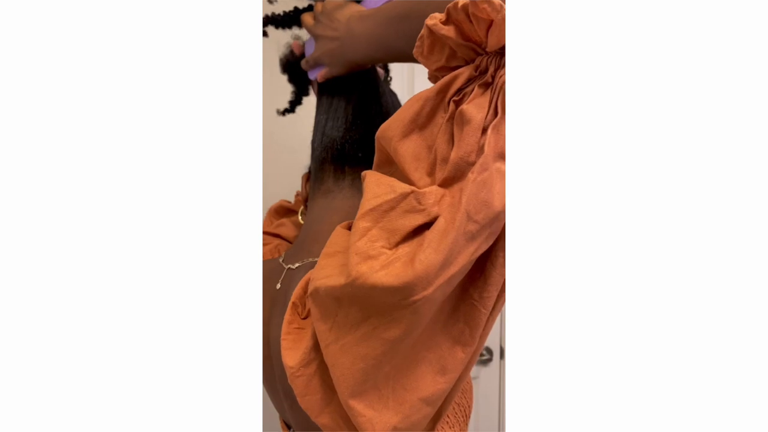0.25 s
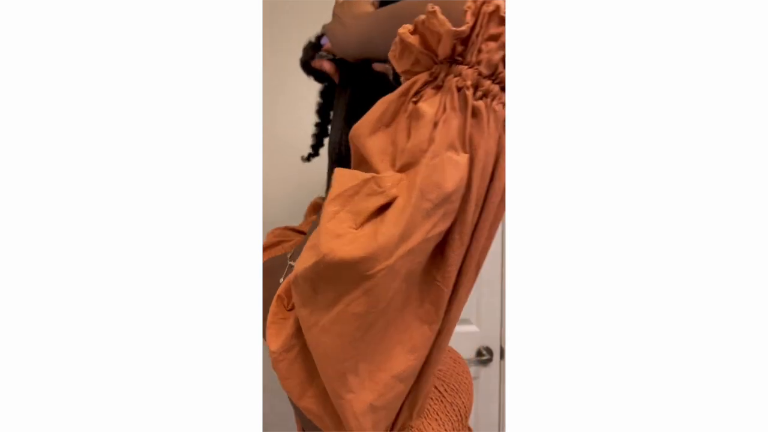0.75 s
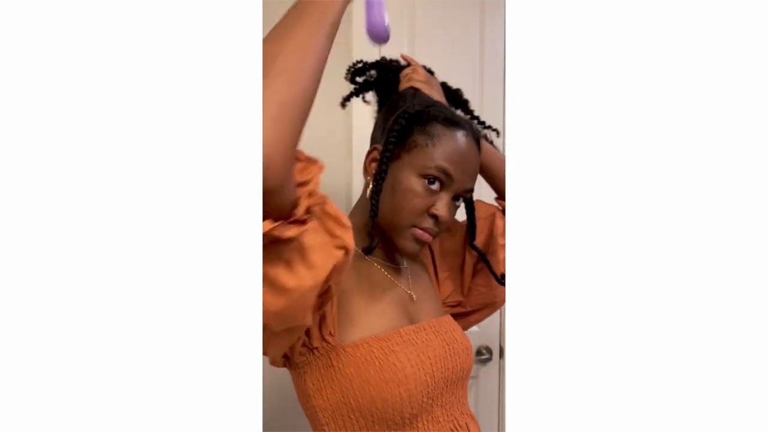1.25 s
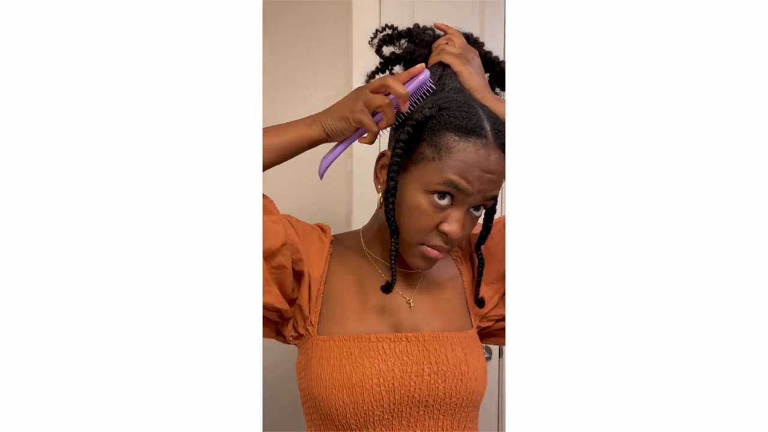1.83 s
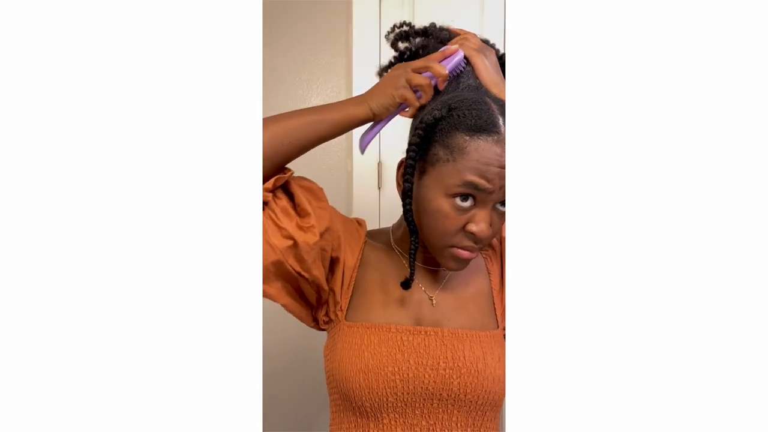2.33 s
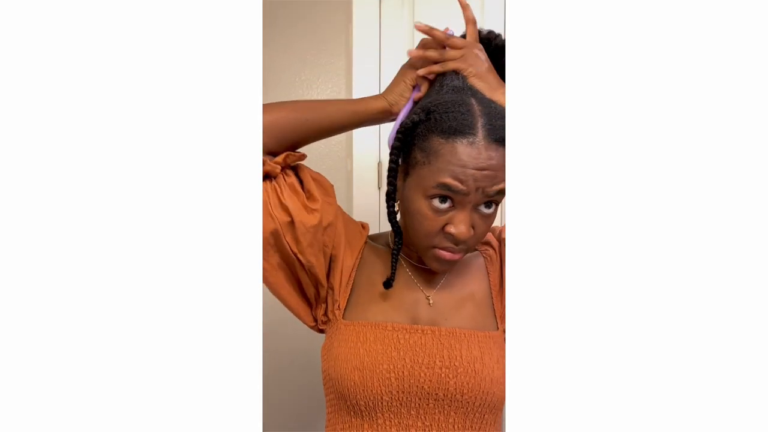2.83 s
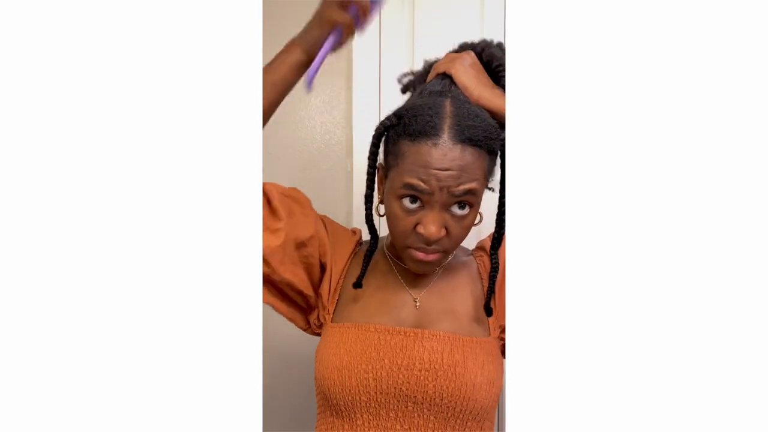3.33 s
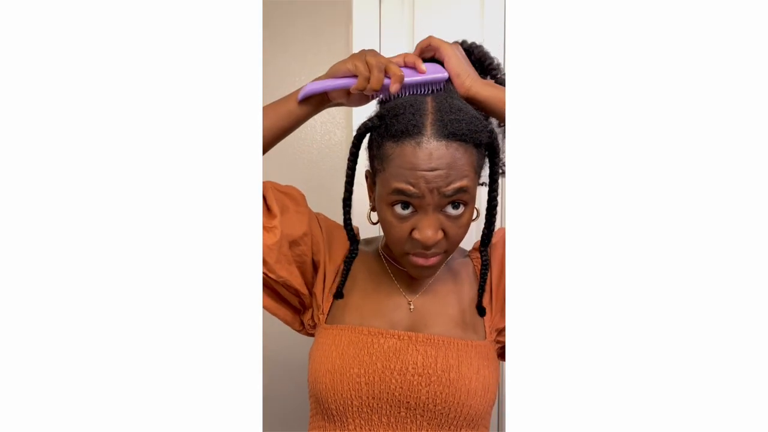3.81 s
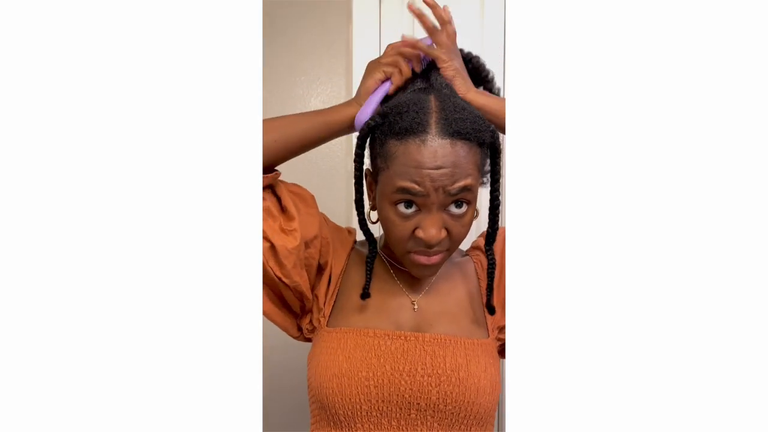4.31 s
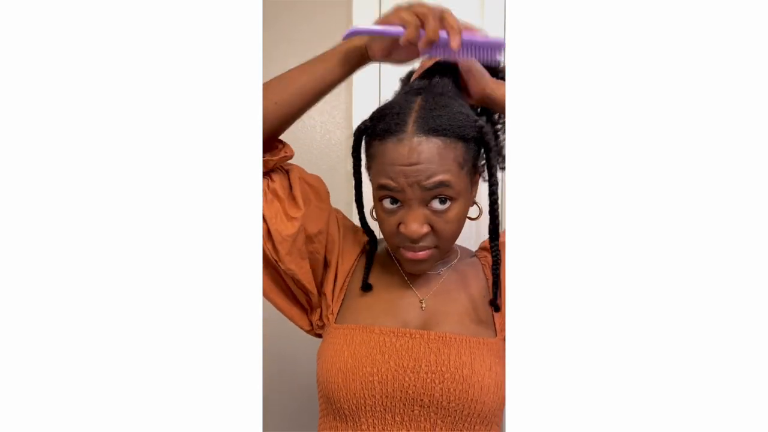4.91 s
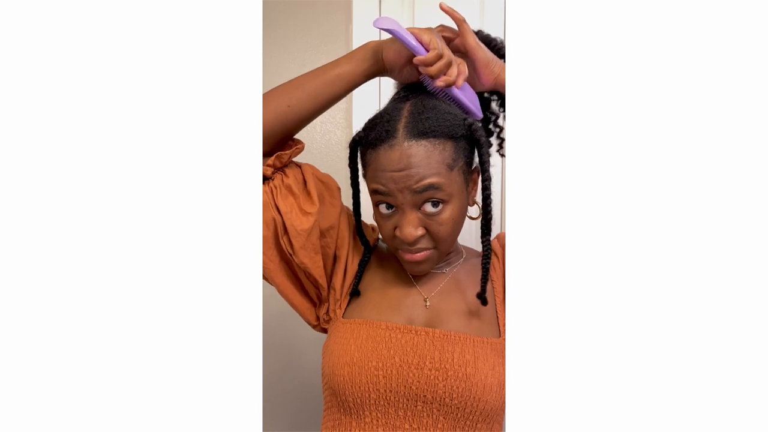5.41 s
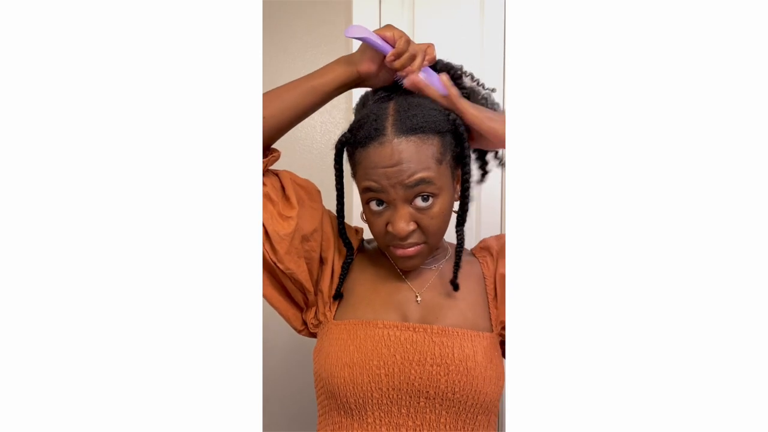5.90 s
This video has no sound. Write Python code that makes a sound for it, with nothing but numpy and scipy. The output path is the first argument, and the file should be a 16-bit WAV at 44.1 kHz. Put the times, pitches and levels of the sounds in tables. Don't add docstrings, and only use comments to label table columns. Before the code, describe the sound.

Scratchy brush strokes rasp through gel-stiff hair in quick bursts, with plastic knocks and bristle pings, a quiet gap, then harder crackling pulls.

```python
import sys
import numpy as np
from scipy import signal
from scipy.fft import rfft, irfft
from scipy.io import wavfile
from scipy.ndimage import uniform_filter1d

SR = 44100
rng = np.random.default_rng(int(sys.argv[2]) if len(sys.argv) > 2 else 0)


def amp(db):
    return 10 ** (np.asarray(db, float) / 20)


def write(x):
    x = np.atleast_2d(x).T
    wavfile.write(sys.argv[1], SR, np.round(np.clip(x, -1, 1) * 32767).astype(np.int16))


N = 271215
HZ = np.fft.rfftfreq(N, 1 / SR)

GRIP_CHANGE_S = [1.12, 1.8, 2.82, 2.931, 3.27, 4.22, 4.95, 5.56, 5.89]
# (frequency [Hz], level [dB])
SCRAPE_COLOUR = [(200, -43), (450, -13), (700, 4), (1400, 2), (1750, -2.5), (2300, 0.5), (3400, -4.5),
                 (4600, -12.5), (6000, -18)]
# (frequency [Hz], level [dB])
STRAND_COLOUR = [(2500, -4.5), (4500, 7.5), (6000, 3.5), (7500, 10), (9000, 5.5), (11500, -6), (14000, 1),
                 (15800, -1)]
FULL_EFFORT_DB = -44.5


def read(table):
    f, v = np.transpose(table)
    return np.interp(np.log(HZ + 1), np.log(f + 1), v)


def follow(table):
    s, *columns = np.transpose(table)
    return [np.interp(np.arange(N) / SR, s, c) for c in columns]


def unit(x):
    return x / np.sqrt(np.mean(x ** 2))


def colour(x, table):
    return unit(irfft(rfft(x) * amp(read(table)), N))


def walk(rate):
    hold = int(SR / rate)
    steps = np.repeat(rng.standard_normal(N // hold + 1), hold)
    return 1.1 * uniform_filter1d(uniform_filter1d(steps, hold), hold)[:N]


def swells(rows):
    lift_db, lift_steeper = 13.5, 1.47
    t = np.arange(0, N, 64) / SR
    under_db = np.array([20 * np.maximum((s - t) / max(rise, .005), (t - s) / max(fall, .005))
                         for s, db, rise, fall, *_ in rows])
    under_db += lift_steeper * np.maximum(under_db - lift_db, 0)
    peak_db = np.array(rows)[:, 1:2]
    return t, amp(2 * (peak_db - under_db))


def ring(x, hz, width):
    return signal.lfilter(*signal.iirpeak(hz, hz / width, SR), x)


def bent_ring(x, hz, width):
    turn = np.exp(2j * np.pi * np.cumsum(hz) / SR)
    pole = np.exp(-np.pi * width / SR)
    return 2 * np.real(turn * signal.lfilter([1 - pole], [1, -pole], x * turn.conj()))


def struck(events, push_s, trim_db):
    out = np.zeros(N + SR)
    for s, db, hz, t60 in events:
        t = np.arange(int(np.clip(t60, .01, .5) * SR)) / SR
        decay = amp(db + trim_db - 60 * t / t60)
        wave = decay * (1 - np.exp(-t / push_s)) * np.sin(2 * np.pi * hz * t)
        out[int(s * SR):int(s * SR) + len(t)] += wave
    return out[:N]


def fan_hum():
    # (time [s], rumble level [dB], extra level of the lowest mode [dB])
    fan_curve = [(0.0, -54, -4), (.48, -53, 3), (.6, -49, 0), (1.0, -47, -0.5), (1.16, -52, 0.5),
                 (1.3, -49.5, -0.5), (1.56, -52, 0), (2.3, -52, 7.5), (2.88, -50.5, 0), (3.36, -53, 2),
                 (3.82, -53.5, 0), (4.3, -53, 2.5), (5.17, -50, -2), (5.48, -59.5, -8), (5.75, -44, 0),
                 (5.87, -57, -3), (6.15, -51.5, 0)]
    # (frequency [Hz], width [Hz], level [dB])
    room_modes = [
        (60.6, 2.7, -5),
        (119.76, 2.54, -4.5),
        (196.3, 6.7, -23.5),
        (292, 20, -31),
    ]
    fan_db, sway_db = follow(fan_curve)
    noise = rng.standard_normal(N)
    lowest_hz = room_modes[0][0]
    hum = sum(amp(db + sway_db * (f == lowest_hz)) * unit(ring(noise, f, w)) for f, w, db in room_modes)
    return amp(fan_db) * hum


def air_noise():
    # (frequency [Hz], level [dB])
    air_colour = [(20, -6), (40, 8), (60, 12), (90, 8), (150, -48), (250, -31), (500, -47), (1500, -37),
                  (4000, -27), (16000, -29)]
    return amp(-58 + 3.5 * walk(3.98)) * colour(rng.standard_normal(N), air_colour)


def sleeve_rustle(effort_db):
    # (frequency [Hz], level [dB])
    sleeve_colour = [(90, -4.5), (160, -4), (300, -10.5), (500, -5.5), (800, -25.5)]
    # (time [s], level [dB], 20 dB rise [s], 20 dB fall [s])
    arm_moves = [
        (1.16, -59.5, .2, .2),
        (4.31, -53.5, 0.09, 0.22),
        (5.75, -51.5, 0.42, 0.39),
    ]
    t, power = swells(arm_moves)
    with_brush = amp(-62.5 + .5 * (effort_db - FULL_EFFORT_DB))
    arm = with_brush + np.interp(np.arange(N) / SR, t, np.sqrt(power.sum(0)))
    cloth = amp(3.7 * walk(25)) * colour(rng.standard_normal(N), sleeve_colour)
    return amp(-6.0) * arm * cloth


def room_tone(effort_db):
    return fan_hum() + sleeve_rustle(effort_db) + air_noise()


def effort():
    # (time [s], scrape
    # level [dB], 20 dB rise [s], 20 dB fall [s], low body re scrape [dB])
    strokes = [(0.002, -44, .1, 0, -4.5), (.116, -37, 0.15, 0.16, -2), (.37, -38.5, 0.26, 0.156, -2),
               (.56, -38, .065, 0.12, 1), (.795, -39.5, 0.06, 0.2535, -1.5), (.865, -41, 0.21, 0.1455, 0.5),
               (.934, -47, 0.4, 0, -3), (2.142, -37, 0.156, 0.21, -3), (2.362, -36, 0.22, 0.2, -4.5),
               (2.495, -39.5, 0.04, 0.08, -3), (2.596, -39, 0.09, .5, -3), (2.754, -39, .4, 0, -5.5),
               (2.848, -44, .04, .04, -12), (2.9, -38.5, .05, 0.1269, -0.5), (2.948, -35.5, 0.08, 0.0669, -1),
               (3.13, -45.5, 0.4, 0.1, 0.5), (3.796, -29, 0.045, 0.156, -7), (3.968, -33.5, 0.1737, 0.11, -2),
               (4.1, -41, 0.2, 0.2052, 0.5), (4.185, -50.5, 0.18, 0.11, 6),
               (4.246, -44.5, 0.0249, 0.2053, 3.5), (4.356, -40.5, 0.27, 0.14, 1.5),
               (4.508, -43, 0.045, 0.24, 4.5), (4.68, -51, .15, .04, 2), (3.905, -37, .05, .06, 0),
               (.07, -43, .04, .08, 0), (.272, -42, .05, .1, -2), (.53, -40, .05, .1, 0),
               (.592, -39, .1, .07, 0), (2.185, -40, .06, .06, -3), (2.665, -42, .04, .08, -3),
               (3.085, -46, .03, .12, 3), (3.826, -31, .08, .04, -4), (4.003, -45, .04, .08, 1),
               (1.186, -60.5, 0.16, 0.32, 0), (1.511, -59, 0.046, 0.11, -7), (1.69, -56.5, .03, 0.28, -19),
               (1.736, -58.5, 0.1, 0.041, -8), (1.82, -52.5, 0.061, 0.16, 4.5),
               (3.332, -64.5, 0.059, 0.15, -5.5), (3.62, -59.5, 0.038, 0.55, 8),
               (4.848, -70, 0.037, .02, -17), (5.085, -57.5, .04, 0.19, 3.5),
               (5.158, -60, 0.12, 0.17, 15.5), (5.344, -50, 0.28, 0.33, 3.5),
               (5.462, -46.5, 0.15, 0.085, 2.5), (5.52, -52, 0.04, 0.37, 8), (5.804, -54.5, 0.68, 0.11, -5),
               (5.956, -50, .008, 0.15, -2.5), (4.425, -46.5, .1, 0.027, 5), (6.11, -38, 0.095, 0.28, 1),
               (1.985, -59, 0.069, .25, 3), (3.53, -70, 0.048, 0.11, 5.5), (3.738, -50, 0.1, .1, 1),
               (3.2, -63, .1, .12, -1), (4.745, -75, 0.092, .08, 22), (5.04, -77, 0.094, .1, 17.5),
               (5.02, -78, .05, .1, 15), (1.615, -74, .02, 0.047, 13),
               (.48, -54.5, .08, 0.088, 4), (1.02, -64.5, .1, 0.095, 2), (1.27, -69, 0.076, 0.18, -4),
                   (2.8, -57, 0.12, 0.092, -2), (5.92, -65, 0.13, 0.16, -1), (1.907, -59.5, .015, 0.037, 5)]
    rest_db, rest_low_db = -90, 7
    rows = strokes
    t, power = swells(rows)
    rest = amp(2 * rest_db)
    total = power.sum(0) + rest
    low_db = (np.array(rows)[:, -1] @ power + rest_low_db * rest) / total
    return follow(np.transpose([t, 10 * np.log10(total), low_db]))


def slips(rate, spread_db, tug_db):
    when, size = rng.random(N), rng.exponential(1, N)
    sign, jerk = rng.standard_normal(N), rng.random(N)
    chance = np.clip((rate / SR - when) * SR / 500 + .5, 0, 1)
    clicks = sign * amp(spread_db * np.minimum(size, 4)) * chance
    tug = signal.lfilter([1], [1, -np.exp(-1 / (.014 * SR))], size * (jerk < 45 / SR))
    sudden = 2.25 * np.tanh(tug / tug.std() / 2.6)
    return unit(clicks * amp(tug_db * (sudden + 0.61 * walk(45) + 0.42 * walk(140))))


def grip_now():
    return np.searchsorted(GRIP_CHANGE_S, np.arange(N) / SR)


def brush_body(x):
    # (frequency [Hz], width [Hz], level [dB])
    back_modes = [
        [(816, 50, -6), (1030, 20, -3.5), (1280, 13, -10)],
        [(1120, 2500, 0)],
        [(770, 120, -9), (1330, 290, -2.5)],
        [(732, 58, 9), (1280, 92, 8), (1460, 46, 4)],
        [(748, 23, 5), (1500, 38, -17)],
        [(792, 19, 1), (1180, 270, -5)],
        [(755, 41, 0.5), (1190, 110, -6), (1470, 98, -7)],
        [(754, 140, -6), (1180, 94, 2)],
        [(665, 180, -6), (1260, 330, -3)],
        [(786, 46, -2), (1280, 50, -7)],
    ]
    bristle_modes = [
        [(2590, 180, -4), (3540, 170, -9.5), (3990, 42, -18)],
        [(2500, 640, 0)],
        [(2072, 100, 3.5), (2760, 78, -10), (3300, 200, -9.5)],
        [(2140, 42, 3.5), (2930, 18, -11), (3110, 110, 2)],
        [(2355, 90, -7), (3120, 82, -8), (3405, 25, -12.5), (3700, 26, -22)],
        [(2500, 140, -12), (2780, 230, 6), (3250, 60, 2), (3900, 78, -16)],
        [(2780, 53, -5), (3170, 49, -7), (3440, 62, -7), (3910, 36, -18)],
        [(1930, 56, -3), (3230, 70, 0), (4000, 97, -14), (4470, 130, -29)],
        [(2480, 140, -6), (3460, 170, -16)],
        [(1950, 27, -21), (3180, 93, -16), (4360, 31, -16)],
    ]
    grip = grip_now()
    damping = [amp(1.5 * walk(14)) for _ in range(4)]
    bend = [1 + .008 * walk(16) for _ in range(4)]
    body = np.zeros((2, N))
    for k, modes in enumerate(zip(back_modes, bristle_modes)):
        held = uniform_filter1d(1. * (grip == k), 1500)
        on = held > 1e-6
        for upper in (0, 1):
            group = 0
            for j, (f, w, db) in enumerate(modes[upper]):
                finger = (j + 2 * upper) % 4
                mode = bent_ring(x[on], f * bend[finger][on], w + 35)
                group = group + amp(db) * mode * damping[finger][on]
            body[upper, on] += held[on] * unit(group)
    return body


def brushing(high_db, low_db):
    # (strand crackle re scrape [dB], brush ringing [dB])
    grip_tone = [(-17, 1), (-11.5, -7.5), (-15, 1), (-23, 5), (-21.5, .5), (-8.5, -1.5), (-11.5, .5),
                 (-9.5, -10), (-26, -5), (-10, -5)]
    strand_db, ring_db = uniform_filter1d(np.array(grip_tone, float)[grip_now()].T, size=1500)
    strand_db = strand_db - 0.0739 * (high_db - FULL_EFFORT_DB)
    catch = slips(rate=6920, spread_db=1.23, tug_db=1.05)
    digs_in_db = -57
    depth_db = np.array([high_db + low_db, high_db]) - digs_in_db
    low, high = brush_body(catch) * amp(ring_db + np.clip(.5 * depth_db, -14, 0))
    scrape = colour(catch, SCRAPE_COLOUR)
    split = signal.butter(3, 1750, fs=SR, output="sos")
    scrape_low = signal.sosfiltfilt(split, scrape)
    low = amp(-4.0) * low + amp(-2.5) * scrape_low
    high = amp(-3.5) * high + amp(-1.18) * (scrape - scrape_low)
    fine = slips(rate=5900, spread_db=2.5, tug_db=4.5)
    strands = amp(7.5) * colour(0.5 * catch + fine, STRAND_COLOUR)
    return amp(high_db - 1.0) * (high + amp(low_db) * low + amp(strand_db) * strands)


def bristle_pings():
    # (time [s], peak level [dB], frequency [Hz])
    ping_events = [(0.0662, -33, 2720), (0.1057, -26.5, 2590), (0.3187, -27, 2590), (2.141, -36, 2330),
                   (2.4932, -25.5, 1980), (2.5646, -27, 2127), (2.6125, -23, 2077), (2.6604, -24, 2104),
                   (2.8744, -22, 2085), (3.7539, -32, 2350), (3.7833, -26.5, 2740), (3.9195, -25, 2760),
                   (5.5029, -36, 3260), (.0408, -33, 2540), (.1416, -28, 2630), (.2683, -31, 2550),
                   (.5212, -29, 2600), (.7751, -32, 2700), (.8295, -29, 2800), (2.0812, -31, 2090),
                   (2.1106, -29, 2110), (2.2333, -32, 2150), (2.3101, -29, 2060), (2.5885, -26, 2090),
                   (2.7711, -30, 2090), (2.8469, -32, 3190), (3.82, -26, 2870), (3.94, -27, 2900),
                   (4.348, -31, 3430), (4.5121, -32, 3220), (6.101, -32, 3420)]
    return struck([(*event, 0.067) for event in ping_events], 0.0013, -4.5)


def brush_knocks():
    # (time [s], peak level [dB], frequency [Hz])
    knock_events = [(0.067, -27.5, 1030), (0.124, -25, 810), (0.527, -22.5, 1030), (0.839, -24, 872),
                    (0.878, -22, 748), (2.234, -42, 1230), (2.339, -25, 786), (2.464, -34, 1190),
                    (2.585, -27, 1227), (2.703, -25, 1230), (2.74, -32, 754), (2.896, -21.5, 732),
                    (3.078, -30, 745), (3.755, -27, 786), (3.824, -22.5, 1246), (3.863, -22, 1043),
                    (3.923, -19.5, 806), (3.981, -32.5, 754), (4.102, -29.5, 1240), (4.237, -30, 786),
                    (4.272, -32, 830), (4.313, -22.5, 807), (4.412, -25.5, 754), (4.514, -20, 791),
                    (4.639, -23, 788), (4.674, -23, 755), (5.505, -24, 1180), (6.082, -27, 1280),
                    (.254, -33, 851), (.344, -31, 1280), (.388, -33, 1020), (.507, -30, 840),
                    (.795, -30, 972), (.811, -29, 956), (2.141, -29, 1330), (2.493, -31, 1330),
                    (2.53, -31, 1190), (2.872, -28, 700), (4.001, -27, 1050), (4.069, -31, 751),
                    (4.129, -28, 805), (4.535, -28, 790), (4.556, -27, 790), (4.615, -32, 780),
                    (6.025, -40, 1180)]
    # (time [s], peak level [dB], frequency [Hz], t60 [s])
    more_knocks = [(5.14, -41.5, 770, 0.11), (5.328, -38.5, 3300, 0.15), (5.345, -34.5, 1234, 0.11),
                   (5.504, -27, 1010, 0.033), (5.506, -32, 637, 0.047), (1.815, -44, 2200, .12),
                   (1.885, -48, 2085, .15), (1.974, -42, 2070, .12), (2.012, -42, 2100, .1),
                   (2.045, -37, 2060, .1), (2.08, -37, 3450, .1), (1.815, -43, 786, .1),
                   (5.64, -50, 2550, .15), (5.7, -49, 2530, .15), (4.808, -63, 2520, .2),
                   (4.87, -65.5, 2500, .15), (4.705, -38, 743, .1), (5.015, -55, 895, .1),
                   (6.098, -27, 795, .08), (6.116, -31, 770, .08), (6.132, -22.5, 760, 0.067)]
    return struck([(*event, 0.056) for event in knock_events] + [*more_knocks], 0.001, -7.0)


def reflect(x, db):
    room_t60_s = 0.091
    t, hop = np.arange(int(.2 * SR)) / SR, 4096
    out = np.zeros(N + 2 * hop + len(t))
    fade = signal.windows.hann(2 * hop, sym=False)
    padded = np.pad(x, (hop, 2 * hop))
    for i in range(0, N + hop, hop):
        tail = rng.standard_normal(len(t)) * amp(-60 * t / room_t60_s) * np.minimum(t / 0.012, 1)
        tail /= np.sqrt(np.sum(tail ** 2))
        piece = signal.fftconvolve(padded[i:i + 2 * hop] * fade, tail)
        out[i:i + len(piece)] += piece[:len(out) - i]
    return amp(db) * out[hop:hop + N]


def strand_ticks():
    # (time [s], peak level [dB])
    tick_events = [(1.0944, -49.5), (1.9659, -55), (3.7549, -31.5), (3.776, -33), (5.5043, -43),
                   (5.6022, -49), (5.9515, -47), (6.057, -43), (2.5526, -42), (2.8419, -44), (3.1348, -46),
                   (5.7612, -54)]
    out, fall = np.zeros(N), np.exp(-np.arange(60) / 12)
    for s, db in tick_events:
        sign = rng.choice([-1., 1.], 60)
        out[int(s * SR):int(s * SR) + 60] += amp(db + 14.5) * fall * sign
    return signal.sosfilt(signal.butter(2, 4500, "high", fs=SR, output="sos"), out)


def heel_thumps():
    # (time [s], peak level [dB], frequency [Hz], t60 [s])
    thump_events = [
        (1.369, -27.5, 65, 0.11),
        (1.395, -21, 61.3, 0.11),
        (1.448, -27.5, 54, 0.21),
    ]
    return struck(thump_events, 0.007, 1.7)


def snags():
    # (time [s], peak level [dB], t60 [s])
    snag_events = [(1.967, -36, 0.07), (2.874, -24, 0.13), (3.077, -29.5, 0.16), (3.604, -40, 0.07),
                   (3.754, -23, 0.091), (3.774, -21, 0.069), (4.236, -26, 0.06), (5.504, -22, 0.032),
                   (5.539, -31, 0.056), (5.951, -37.5, 0.029), (5.632, -36.5, 0.06), (5.783, -42, 0.025)]
    t, burst = np.arange(6000) / SR, np.zeros(N + 6000)
    for s, db, t60 in snag_events:
        burst[int(s * SR):int(s * SR) + 6000] += amp(db - 60 * t / t60)
    rattle = rng.standard_normal(N)
    body = amp(-12.5) * colour(rattle, SCRAPE_COLOUR) + amp(-23.0) * colour(rattle, STRAND_COLOUR)
    return signal.sosfilt(signal.butter(3, 550, "high", fs=SR, output="sos"), burst[:N] * body)


def scene():
    # (frequency [Hz], correlation)
    port_likeness = [(100, .998), (200, .85), (400, .45), (800, .6), (2000, .68), (5000, .7), (7000, .78),
                     (16000, .79)]
    high_db, low_db = effort()
    near = brushing(high_db, low_db) + bristle_pings() + brush_knocks() + snags()
    shared = near + reflect(near, -5) + room_tone(high_db) + strand_ticks() + heel_thumps()
    scattered = reflect(near, 3.08) + room_tone(high_db)
    like = np.clip(read(port_likeness), 0, 1)
    mid = irfft(rfft(shared) * np.sqrt((1 + like) / 2), N)
    side = irfft(rfft(scattered) * np.sqrt((1 - like) / 2), N)
    return np.array([mid + side, mid - side])


def joint_stereo(left, right):
    attack_s = [.244, 2.032, 3.76, 5.503, 5.945, 6.049]
    # (start [s], end [s])
    lean_spans = [(.47, .48), (.7, .72), (1.12, 1.13), (1.3, 1.48), (1.58, 1.67), (1.88, 1.97),
                  (2.05, 2.13), (2.23, 2.25), (2.3, 2.32), (2.47, 2.48), (2.54, 2.55), (2.84, 2.85),
                  (3.12, 3.13), (3.23, 3.64), (3.79, 3.83), (3.88, 3.97), (4.16, 4.31), (4.49, 4.52),
                  (4.65, 4.66), (4.77, 5.08), (5.18, 5.2), (5.53, 5.54), (5.62, 5.66), (5.76, 5.78),
                  (5.9, 5.92), (6.07, 6.1)]
    n, k, lead = np.arange(2048)[:, None], np.arange(736), 2048 - 509
    window = signal.windows.kaiser_bessel_derived(2048, 4 * np.pi)[:, None]
    basis = np.float32(window * np.cos(np.pi / 1024 * (n + 512.5) * (k + .5)))
    count = (N + lead) // 1024 + 2
    blocks = np.pad([left + right, left - right], ((0, 0), (lead, count * 1024 - N - lead)))
    blocks = blocks.reshape(2, count, 1024)
    z = np.float32(np.concatenate([blocks[:, :-1], blocks[:, 1:]], axis=2)) @ basis
    s = ((np.arange(count - 1) + 1) * 1024 - lead) / SR
    around = uniform_filter1d((z ** 2).sum(0), 65, axis=1) + 1e-18
    power = uniform_filter1d(z ** 2 / around, 3, axis=1).reshape(2, -1, 46, 16).sum(3)
    power = np.repeat(power, 16, axis=2)
    margin_db = np.interp(k * SR / 2048, [1200, 1500, 4900, 5300, 5800, 6300, 11000, 12000],
                          [-40, -11, -11, -8.5, -8, -4.3, -4.3, -3])
    attack = np.abs(s[:, None] - attack_s).min(axis=1)[:, None] < .016
    lean = np.any([(s > a) & (s < b) for a, b in lean_spans], axis=0)[:, None]
    lean = lean * np.clip((k - 45) / 150, 0, 1)
    strong = power > amp(2 * margin_db) * power[::-1]
    z *= (strong & (z ** 2 > .4 * lean * around)) | attack
    frames, out = z @ basis.T / 512, np.zeros(blocks.shape)
    out[:, :-1] += frames[:, :, :1024]
    out[:, 1:] += frames[:, :, 1024:]
    mid, side = out.reshape(2, -1)[:, lead:lead + N] / 2
    return np.array([mid + side, mid - side])


def band_limit(x):
    return signal.sosfilt(signal.butter(12, 17100, fs=SR, output="sos"), x)


def record(dry):
    # (frequency [Hz], lead of the left port [rad])
    port_lead = [(0, 0), (300, .05), (1000, .3), (5200, .45), (7350, 3.14), (10450, 6.28), (13600, 9.42),
                 (16700, 12.6)]
    f, lead = np.transpose(port_lead)
    turn = np.exp(.5j * np.interp(HZ, f, lead))
    ports = irfft(rfft(dry) * np.array([turn, np.conj(turn)]), N)
    mix = joint_stereo(*ports)
    return band_limit(mix)


dry = scene()
out = record(dry)
write(out)
```